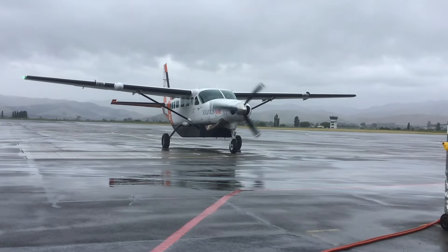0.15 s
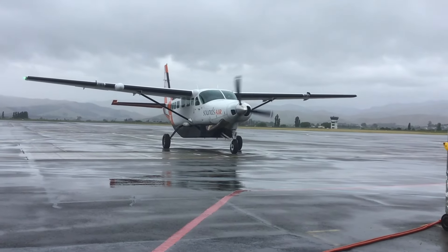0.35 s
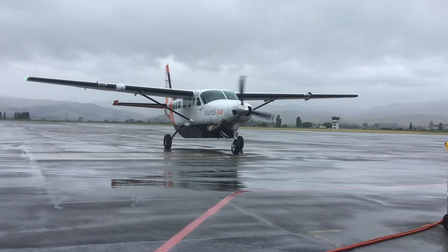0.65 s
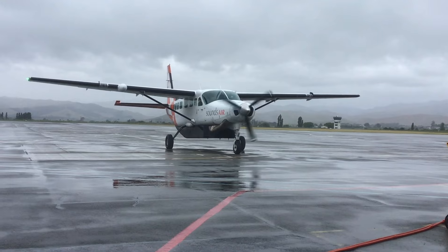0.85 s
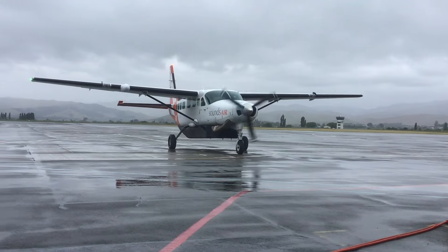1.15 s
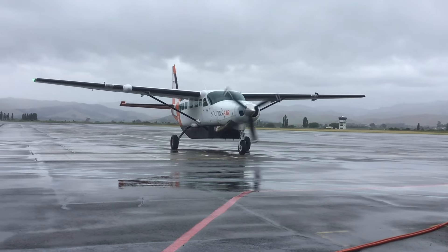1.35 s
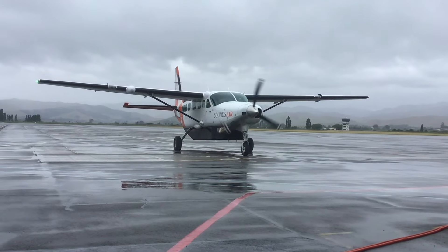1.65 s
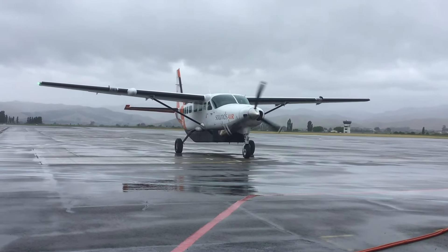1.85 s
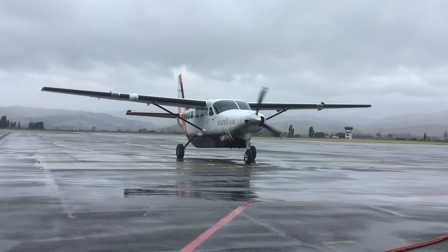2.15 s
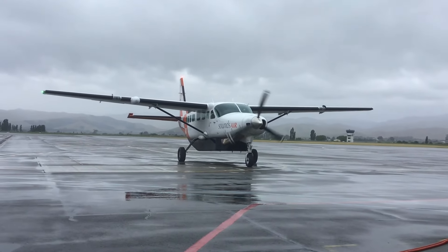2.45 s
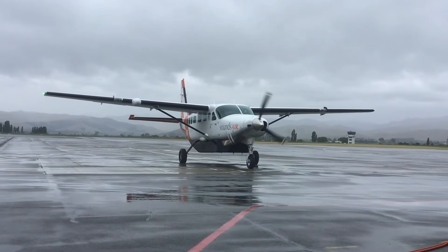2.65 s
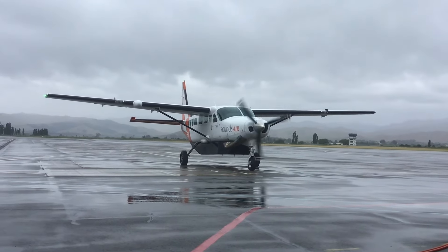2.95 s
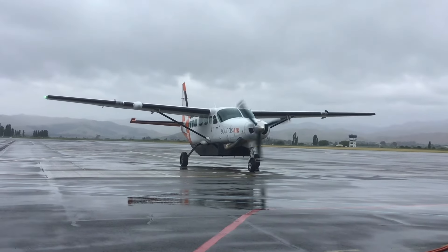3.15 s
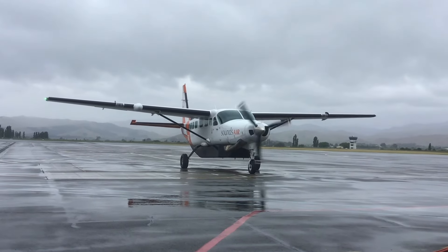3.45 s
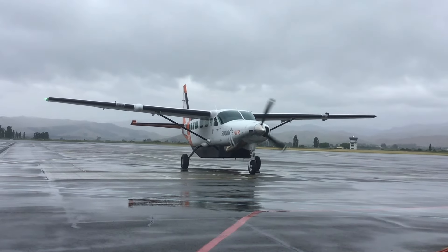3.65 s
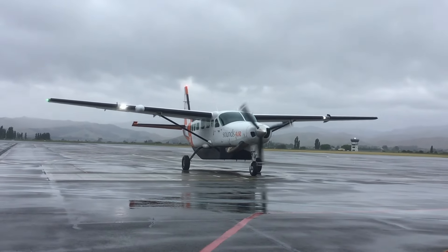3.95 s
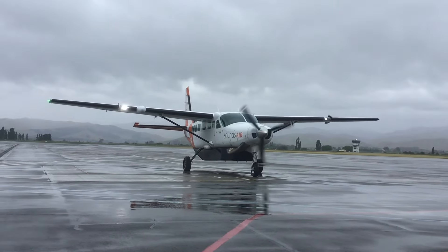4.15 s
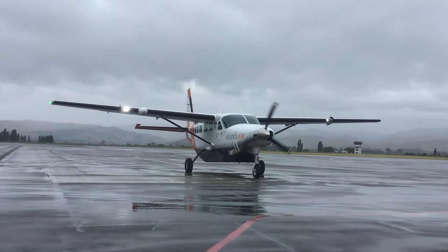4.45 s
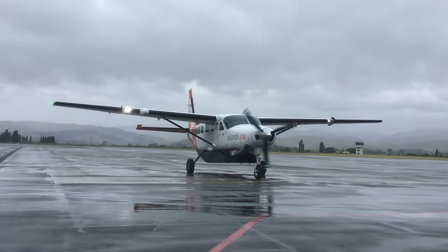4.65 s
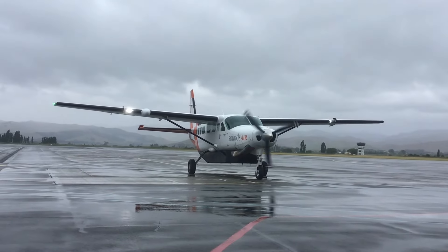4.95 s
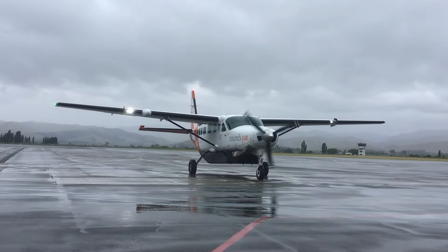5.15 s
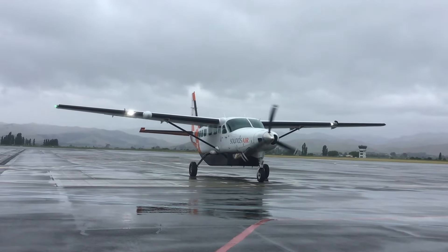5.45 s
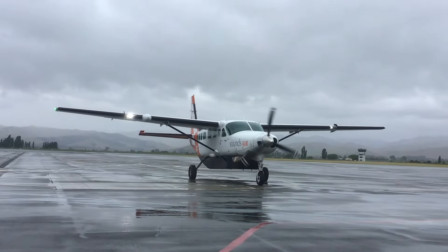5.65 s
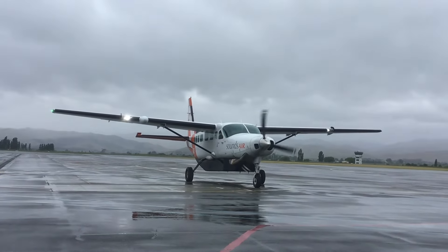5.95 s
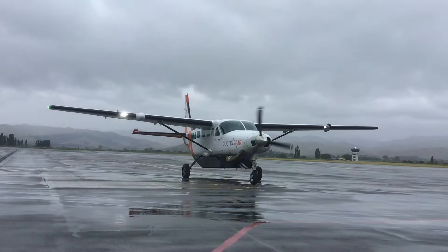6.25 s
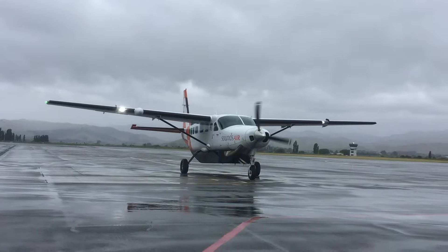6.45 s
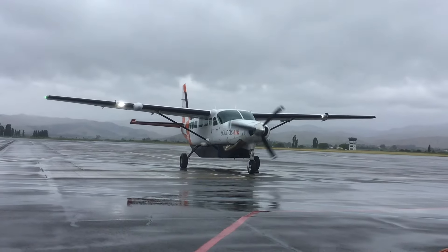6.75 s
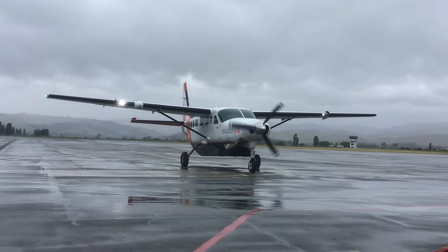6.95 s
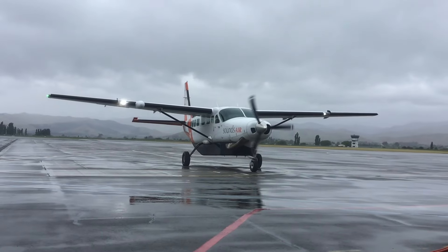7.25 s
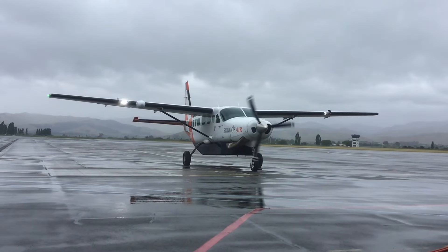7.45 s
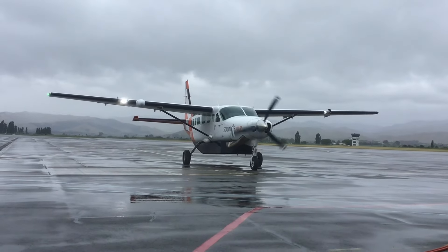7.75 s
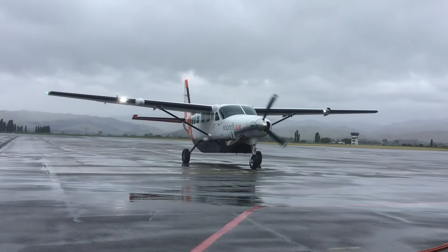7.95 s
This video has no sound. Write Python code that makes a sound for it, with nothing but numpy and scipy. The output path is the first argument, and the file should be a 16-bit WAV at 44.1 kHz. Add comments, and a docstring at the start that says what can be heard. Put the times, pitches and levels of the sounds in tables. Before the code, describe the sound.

Steady low propeller drone from a nearby turboprop aircraft, with a thin high whine, airy howl and jet hiss.

```python
"""The propeller of a single turboprop beats at idle on a wet apron, a short walk from the listener.
Each blade passage radiates a pressure pulse, heard as a thump and a slap, and a puff of turbulence.
The intake howls in narrow duct resonances, the compressor whines through the propeller disc,
and the exhaust jet hisses. A dull rumble lies underneath."""
import sys
import numpy as np
from scipy import signal
from scipy.fft import rfft, irfft, next_fast_len
from scipy.io import wavfile
from scipy.ndimage import uniform_filter1d, map_coordinates

SR = 44100
rng = np.random.default_rng(int(sys.argv[2]) if len(sys.argv) > 2 else 0)


def transcribe(u):
    """Save the signal u as a 16-bit wav file named by the first command-line argument.

    u: samples, shape (n,) or (channels, n), limited to [-1, 1]; the rate is SR.
    q: integer samples, one column per channel.
    """
    v = np.clip(np.atleast_2d(u).T, -1, 1)
    q = np.round(v * 32767).astype(np.int16)
    wavfile.write(sys.argv[1], SR, q)


N = 356769

# Spectra of the rumble and of three bands of jet hiss: (frequency [Hz], relative density [dB])
RUMBLE_SPECTRUM = [(15, -40), (33, -19), (45, -13), (72, 2), (100, -10.5), (140, -120)]
JET_LOW_SPECTRUM = [(2300, -120), (3000, -2.5), (3400, -4), (3900, -0.5), (4600, 1), (5000, 1),
                    (5300, -4.5), (5700, -120)]
JET_MID_SPECTRUM = [(4800, -120), (5330, 0), (6640, 2.5), (8000, -3.5), (9400, -4), (10000, -5),
                    (10600, -24), (11500, -120)]
JET_TOP_SPECTRUM = [(9300, -120), (10150, -9), (10500, -1.5), (12800, -9.5), (14400, -12), (15750, -13),
                    (16500, -120)]
# The hiss comes and goes as air drifts across the path: (time [s], top level [dB], middle level [dB])
HISS_LEVELS = [(0.05, -47.5, -36.5), (0.47, -47, -33.5), (0.6, -55, -37), (0.65, -49, -43),
               (0.82, -54, -37), (1.02, -47.5, -36), (1.67, -49, -36), (1.82, -55, -40), (2.0, -51.5, -39),
               (2.84, -47, -36), (3.08, -55, -37.5), (3.19, -46, -33.5), (3.35, -51, -39.5),
               (3.77, -48, -35.5), (4.08, -51, -37), (4.57, -47, -35.5), (5.67, -51.5, -37),
               (5.74, -47, -35.5), (6.07, -49, -33.5), (6.38, -53, -38), (6.65, -49, -35.5),
               (8.0, -49.5, -37)]

# Compressor tone: (time [s], frequency [Hz])
WHINE_PITCH = [(0, 4958), (1, 4965), (2, 4969), (3, 4975), (4, 4977.5), (5, 4979.5), (8.09, 4981.5)]
# Compressor tone: (time [s], level [dB])
WHINE_LEVEL = [(0.05, -45), (0.14, -40), (0.69, -47), (0.73, -52), (1.18, -35), (1.42, -43), (1.62, -34.5),
               (1.73, -47), (1.97, -37.5), (2.46, -32), (2.53, -37), (2.77, -31.5), (3.66, -45),
               (4.15, -40.5), (4.81, -45.5), (6.29, -44), (6.34, -48), (8.0, -42)]
# Distance of each sideband from the tone: (offset [blade rates])
SIDEBAND_ORDERS = (-3, -2, -1, 1, 2, 4)
# The same sidebands: (initial level [dB], final level [dB])
SIDEBAND_LEVELS = [(-68, -51), (-59, -52), (-53, -47), (-44.5, -58), (-52, -55), (-52, -65)]
# Noise halos round the tone and its overtones: (centre [Hz], width [Hz], level [dB])
HALOS = [(4977, 65, -44), (9990, 180, -51.5), (14900, 200, -59.5)]
# How far each halo follows the top of the hiss: (share of its swing [ratio])
HALO_SHARES = (.1, .5, .8)

# Intake resonances: (centre [Hz])
DUCT_CENTRES = (1780, 1912, 2070, 2200, 2315, 2490, 2580, 2720, 2815, 2885, 2970, 3160, 4600)
# The same resonances: (width [Hz], relative peak density [dB])
DUCT_SHAPES = [(93, -6.5), (63.6, -1), (170, -7), (108, -3), (86.5, 1), (41.6, 3), (97, 0), (118, -3.5),
               (21, -2.5), (60, -10.5), (84, -11.5), (60, -10), (500, -14.5)]
# All but the two lowest resonances together: (time [s], level [dB])
HOWL_LEVEL = [(0.05, -30), (0.43, -31), (0.56, -27.5), (0.93, -33.5), (2.37, -33), (4.21, -29), (8.0, -30)]

# Propeller speed: (time [s], blade passage rate [Hz])
BLADE_RATE = [(0, 44.865), (4.5, 44.88), (6.4, 45.2), (8.09, 45.2)]
# Blade pulses: (time [s], beat level [dB], lean toward the deep end [dB], slap level [dB])
BEAT_LEVELS = [(0.1, -25.5, -2.5, -34), (0.43, -23, -6, -32), (0.49, -26, -7.5, -37), (1.4, -22, -7, -33.5),
               (2.61, -26, -2.5, -34.5), (2.8, -19.5, -14.5, -31.5), (2.98, -26, -12, -32.5),
               (3.58, -23.5, -6, -34), (3.75, -29, -5.5, -41), (3.84, -24.5, -10, -31),
               (4.13, -23, -10, -36), (4.3, -26.5, -11, -33), (4.37, -22, -17, -36),
               (4.57, -30.5, 2, -34.5), (4.92, -26.5, -12, -32.5), (4.94, -25.5, -13.5, -39),
               (5.09, -33.5, 1.5, -38.5), (5.64, -28, -5.5, -34.5), (6.17, -31.5, -2.5, -37),
               (6.52, -23, -12, -29.5), (7.1, -22.5, -3.5, -34.5), (7.42, -22, -7, -31),
               (7.69, -25.5, -9, -37.5), (7.73, -22, -16, -31.5), (7.96, -22.5, -4, -30),
               (8.0, -22, -8, -33)]
# Deep, middle and upper thump follow the beat: (offset [dB], swing share [ratio], lean share [ratio])
THUMP_BANDS = [(-7, 1.09, 1.06), (-5, 1.52, 0.23), (-3.5, 1.16, -0.24)]
# Pulse and wash spectra; the ground echo cancels near 430 Hz: (frequency [Hz], relative density [dB])
DEEP_SPECTRUM = [(30, -48), (45, -41), (90, 1), (135, 5.5), (160, -4), (230, -120)]
MIDDLE_SPECTRUM = [(110, -120), (155, -20), (180, -1), (225, -1), (250, -33), (350, -120)]
UPPER_SPECTRUM = [(180, -120), (245, -7), (270, 1.5), (315, 1.5), (360, 0), (405, -18), (450, -28),
                  (600, -120)]
SLAP_SPECTRUM = [(330, -120), (430, -14), (540, 0.5), (650, 1), (810, -2), (950, -9.5), (1300, -15.5),
                 (2200, -29), (4000, -120)]
WASH_SPECTRUM = [(60, -60), (85, -11), (110, -7.5), (160, 3), (260, -4), (370, -1), (440, -11), (560, -5.5),
                 (800, -10), (1100, -13.5), (1550, -15.5), (2500, -11), (4000, -120)]
# Slaps steady as the nose turns: (time [s], jitter [s], size scatter [dB], share torn by eddies [0-1])
SLAP_IRREGULARITY = [(0, .0004, 2, 1), (5.6, .0004, 2, 1), (6.3, .00008, 1, .35), (8.09, .00008, 1, .35)]
# Single accented slaps: (time [s], level above the usual slap [dB])
SLAP_ACCENTS = [(.337, 5), (1.772, 0), (1.795, 4), (2.214, 6.5), (3.152, 7.5), (3.822, 8), (4.579, 7.5)]


def amp(db):
    """Decibels to amplitude ratio."""
    return 10 ** (np.asarray(db) / 20)


def unit(x):
    """Normalisation to rms 1."""
    return x / np.sqrt(np.mean(x ** 2) + 1e-20)


def curves(rows):
    """Linear interpolation of each column after the time, one value a sample."""
    times, *columns = np.transpose(rows)
    return [np.interp(np.arange(N) / SR, times, column) for column in columns]


def swing(rows):
    """Deviation of a table's first level curve from its mean."""
    level = curves(rows)[0]
    return level - level.mean()


def cycles(rows):
    """Phase in cycles, the time integral of frequency."""
    return np.cumsum(curves(rows)[0]) / SR


def wobble(rate_hz):
    """Slow random modulation: a spline through rate_hz Gaussian values a second."""
    knots = rng.standard_normal(int(N * rate_hz / SR) + 4)
    coarse = np.arange(0, N + 64, 64)
    return np.interp(np.arange(N), coarse, map_coordinates(knots, [coarse * rate_hz / SR]))


def drift(first_db, last_db):
    """A gain ramp, linear in decibels, as the aircraft creeps round."""
    return amp(np.linspace(first_db, last_db, N))


def filtered(x, response):
    """Linear filtering: the spectrum is multiplied by a frequency response."""
    size = next_fast_len(N + 8192)
    return irfft(rfft(x, size) * response(np.fft.rfftfreq(size, 1 / SR)), size)[..., :N]


def coloured(x, spectrum):
    """Spectral shaping on a logarithmic frequency axis, at rms 1."""
    points_hz, db = np.transpose(spectrum)
    return unit(filtered(x, lambda hz: amp(np.interp(np.log(hz + 1), np.log(points_hz + 1), db))))


def narrowband(centre_hz, width_hz):
    """Resonance: a narrow peak selects a band of white noise, at rms 1."""
    return unit(filtered(rng.standard_normal(N), lambda hz: 1 / (1 + (2 * (hz - centre_hz) / width_hz) ** 2)))


def eddy_noise(depth_db):
    """Scattering by eddies gives white noise patches of gain in time and frequency."""
    spectra = signal.stft(rng.standard_normal(N + 512), nperseg=512)[2]
    field = uniform_filter1d(rng.standard_normal(spectra.shape), size=8, axis=0)
    field = uniform_filter1d(field, size=12, axis=1)
    return signal.istft(spectra * amp(depth_db * unit(field)), nperseg=512)[1][:N]


def fading(x, depth_db, slip_rad, window):
    """Scintillation: moving air makes patches of the spectrum swell, fade and slip in phase."""
    spectra = signal.stft(x, nperseg=window)[2]
    field = uniform_filter1d(rng.standard_normal((2, *spectra.shape)), size=5, axis=1)
    field = uniform_filter1d(field, size=5, axis=2)
    gain, phase = field / field.std()
    faded = spectra * amp(depth_db * gain) * np.exp(1j * slip_rad * phase)
    return signal.istft(faded, nperseg=window)[1][:N]


def chop(blade_phase, depth_db, lead):
    """Amplitude modulation at the blade rate, peaking lead cycles before each passage."""
    return unit(amp(depth_db * np.cos(2 * np.pi * (blade_phase + lead))))


def rumble():
    """Low-frequency noise without pitch, likely wind and far engines."""
    return drift(-35.5, -45.5) * amp(1.9 * wobble(1.84)) * coloured(eddy_noise(0.51), RUMBLE_SPECTRUM)


def exhaust(blade_phase):
    """Turbulent jet noise: a broad hiss whose upper bands flicker and are chopped by the blades."""
    top_db, mid_db = curves(HISS_LEVELS)
    flicker = amp(0.85 * wobble(12)) * chop(blade_phase, depth_db=1.0, lead=0.23)
    low = amp(-34.5 + 0.1 * swing(HOWL_LEVEL)) * coloured(eddy_noise(1.34), JET_LOW_SPECTRUM)
    top_db = top_db + wobble(26)  # the thinnest hiss flickers most
    mid = amp(mid_db) * coloured(eddy_noise(1.4), JET_MID_SPECTRUM)
    top = amp(top_db) * coloured(eddy_noise(1.2), JET_TOP_SPECTRUM)
    return low + flicker * (mid + top)


def compressor(blade_phase):
    """A blade-passing tone and its octave in halos of noise; modulation by the propeller adds sidebands."""
    def sine(phase):
        return np.sqrt(2) * np.sin(2 * np.pi * phase)  # rms 1

    whine_phase = cycles(WHINE_PITCH) + .022 * wobble(25)
    tone = amp(curves(WHINE_LEVEL)[0] + 1.5 * wobble(20)) * sine(whine_phase)
    hiss_swing = swing(HISS_LEVELS)
    octave_db = -52 + 0.69 * swing(WHINE_LEVEL) + 0.97 * hiss_swing + 4.1 * wobble(30)
    octave = amp(octave_db) * sine(2 * whine_phase) * chop(blade_phase, depth_db=1.5, lead=.1)
    sidebands = sum(drift(*levels) * amp(1.3 * wobble(9.2)) * sine(whine_phase + order * blade_phase)
                    for order, levels in zip(SIDEBAND_ORDERS, SIDEBAND_LEVELS))
    halos = sum(amp(db + share * hiss_swing + 2.8 * wobble(12)) * narrowband(hz, width)
                for (hz, width, db), share in zip(HALOS, HALO_SHARES))
    return tone + octave + sidebands + halos


def intake(blade_phase):
    """Duct resonance: inrushing air excites narrow modes, each wavering in level."""
    lower_db = -40 + 0.5 * wobble(4.5)
    modes = [amp(db + 1.94 * wobble(2.533)) * np.sqrt(width) * narrowband(hz, width)
             for hz, (width, db) in zip(DUCT_CENTRES, DUCT_SHAPES)]
    lower = amp(lower_db) * unit(sum(modes[:2]))
    upper = amp(curves(HOWL_LEVEL)[0]) * unit(sum(modes[2:]))
    return (lower + upper) * chop(blade_phase, depth_db=1.27, lead=0.16)


def blade_pulses(blade_phase, jitter_s, scatter_db, accents=()):
    """A quasi-periodic impulse train: one impulse a blade passage, uneven in time and size."""
    passages = np.flatnonzero(np.diff(np.floor(blade_phase)))
    timing, size = rng.standard_normal((len(passages), 2)).T
    size_db = np.broadcast_to(scatter_db, N)[passages] * size
    for time_s, db in accents:
        size_db[np.argmin(abs(passages - time_s * SR))] = db
    delays = np.round(np.broadcast_to(jitter_s, N)[passages] * SR * timing).astype(int)
    train = np.zeros(N)
    train[np.clip(passages + delays, 0, N - 1)] = amp(size_db)
    return train


def downward_sweep(hz):
    """All-pass response with group delay sweep_s ln(pivot_hz / hz): low frequencies arrive last."""
    sweep_s, pivot_hz, phase_rad = .003, 330.3, 3.81
    return np.exp(1j * (phase_rad - 2 * np.pi * sweep_s * hz * (np.log(pivot_hz / (hz + 1)) + 1)))


def propeller(blade_phase):
    """Rotational noise, a three-band thump and a sharp slap at each passage, over a turbulent wash."""
    beat_db, lean_db, slap_db = curves(BEAT_LEVELS)
    thumps = blade_pulses(blade_phase, jitter_s=.0001, scatter_db=1.5)
    jitter_s, scatter_db, torn = curves(SLAP_IRREGULARITY)
    slaps = blade_pulses(blade_phase, jitter_s, scatter_db, SLAP_ACCENTS)
    # eddies give every slap its own colour
    slaps = (1 - torn) * slaps + torn * fading(slaps, depth_db=2.2, slip_rad=.4, window=600)
    beat = amp(slap_db) * coloured(slaps, SLAP_SPECTRUM)
    beat_swing, lean_swing = swing(BEAT_LEVELS), lean_db - lean_db.mean()
    spectra = DEEP_SPECTRUM, MIDDLE_SPECTRUM, UPPER_SPECTRUM
    for (offset_db, swing_share, lean_share), spectrum in zip(THUMP_BANDS, spectra):
        band_db = beat_db.mean() + offset_db + swing_share * beat_swing + lean_share * lean_swing
        beat += amp(band_db) * coloured(thumps, spectrum)
    wash = coloured(eddy_noise(1.43) * chop(blade_phase, depth_db=3.0, lead=0.33), WASH_SPECTRUM)
    beat = fading(beat, depth_db=2.6, slip_rad=.35, window=4096)
    return filtered(beat, downward_sweep) + drift(-29.3, -31.5) * wash


def scene():
    """Superposition of the sources, identical in both channels."""
    blade_phase = .45 + cycles(BLADE_RATE)  # counted in blade passages
    mono = (propeller(blade_phase) + rumble() + intake(blade_phase)
            + compressor(blade_phase) + exhaust(blade_phase))
    return np.array([mono, mono])


def record(dry, cutoff_hz=15750):
    """Band limiting by an ideal low-pass filter."""
    return filtered(dry, lambda hz: hz < cutoff_hz)


dry = scene()
out = record(dry)
transcribe(out)
```